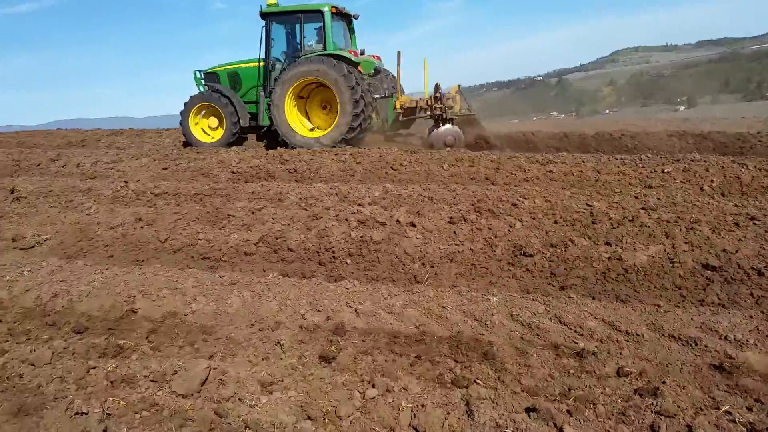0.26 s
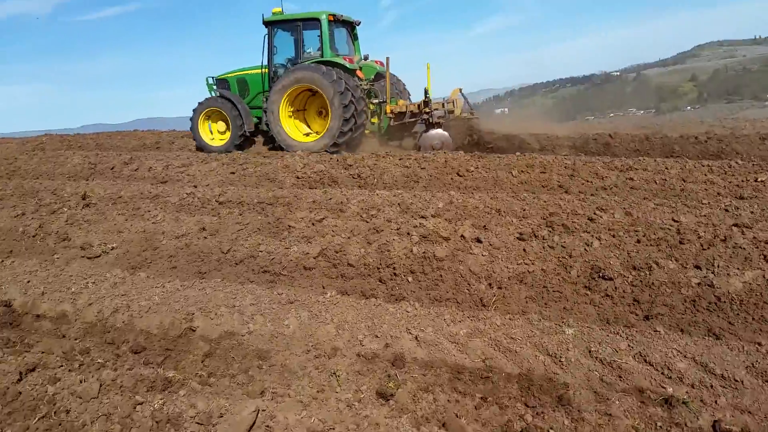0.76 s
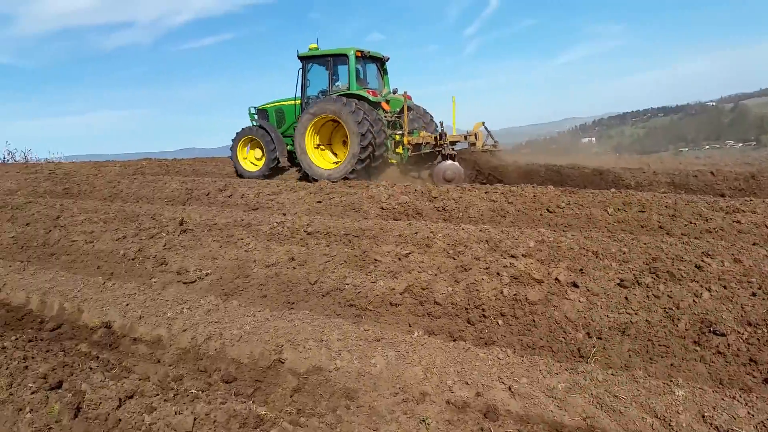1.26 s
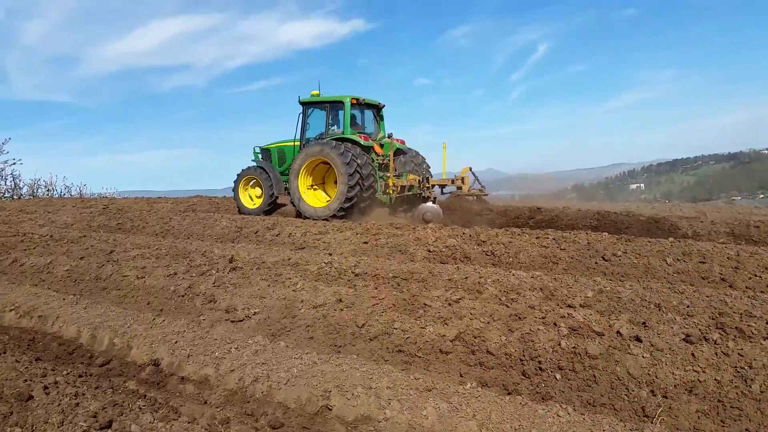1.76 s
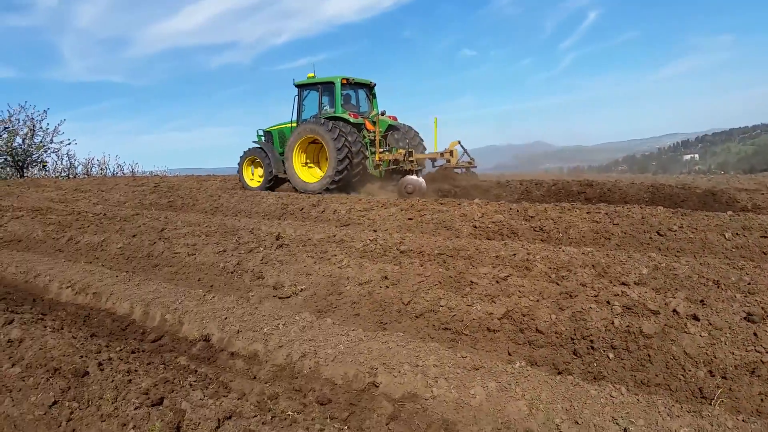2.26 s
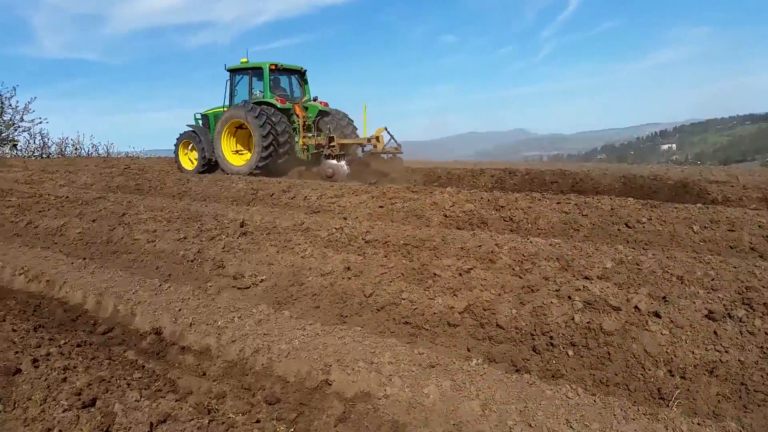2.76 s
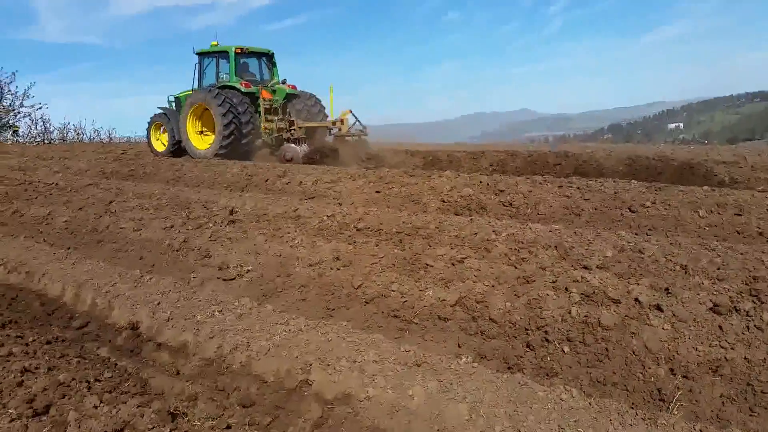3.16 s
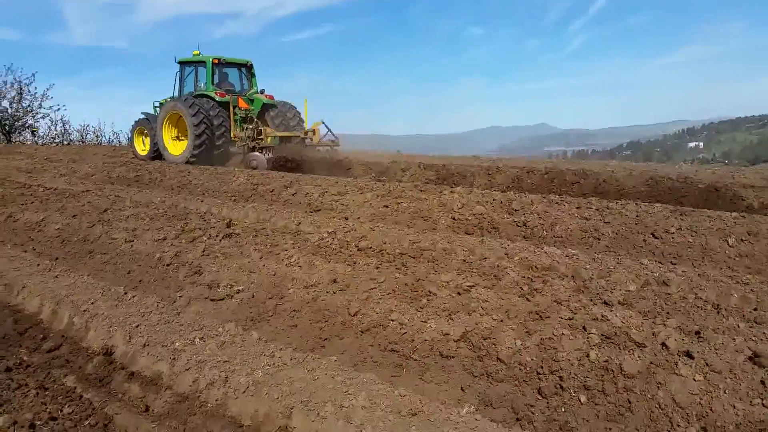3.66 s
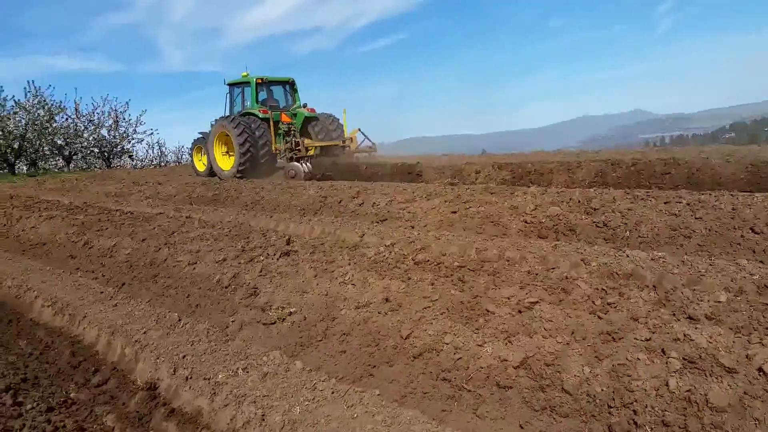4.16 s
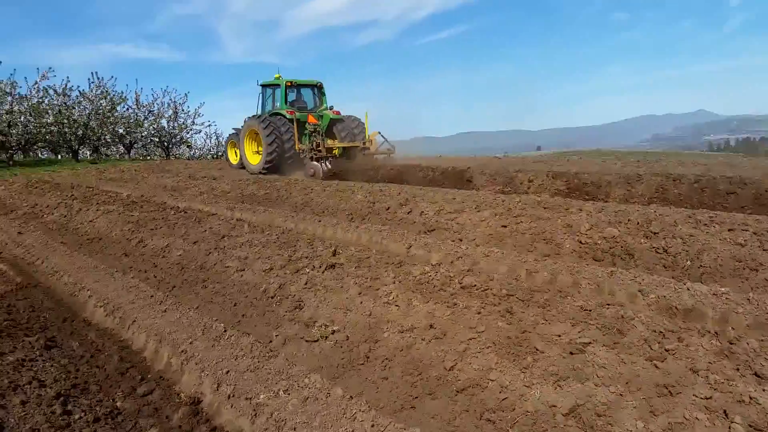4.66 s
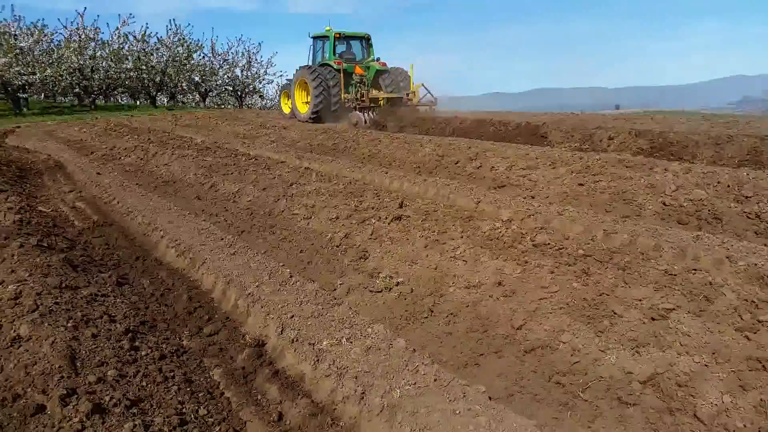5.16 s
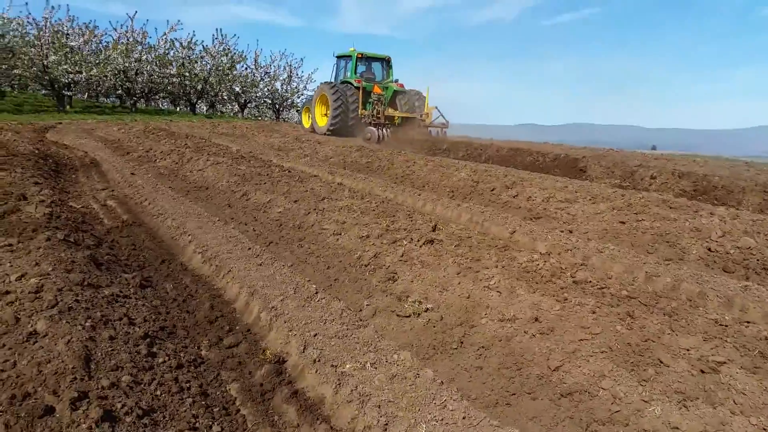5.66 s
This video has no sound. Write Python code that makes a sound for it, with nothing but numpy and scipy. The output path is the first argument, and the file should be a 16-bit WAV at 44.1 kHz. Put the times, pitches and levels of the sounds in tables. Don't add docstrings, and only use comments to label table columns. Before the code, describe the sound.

Steady low tractor engine hum with rough exhaust and clatter, hissing soil and sharp stone knocks early on, gradually receding across an open field.

```python
import sys
import numpy as np
from scipy import signal
from scipy.io import wavfile
from scipy.ndimage import uniform_filter1d

SR = 44100
rng = np.random.default_rng(int(sys.argv[2]) if len(sys.argv) > 2 else 0)


def natural_amplitude(level_db):
    exponent = np.asarray(level_db, float) / 20
    return 10 ** exponent


def log_audio(samples):
    frames = np.atleast_2d(samples).T
    limited = np.clip(frames, -1, 1)
    pcm = np.round(limited * 32767).astype(np.int16)
    wavfile.write(sys.argv[1], SR, pcm)


N = 260631
TIME = np.arange(N) / SR
HZ = np.fft.rfftfreq(1024, 1 / SR)
FRAME_TIMES = np.arange(N // 256 + 5) * 256 / SR
PIPE_WIDTH_HZ = 92

# (time [s], firing rate [Hz])
FIRING = [(0, 69.7), (.3, 72.3), (.8, 69.1), (1.05, 72.4), (1.35, 67.6), (1.61, 71.6), (1.78, 69.6),
          (1.96, 72), (2.13, 68.6), (2.39, 73.4), (2.64, 68.9), (2.9, 71.7), (3.18, 69.2), (3.35, 70.7),
          (4.75, 70.7), (4.98, 69.8), (5.35, 71.7), (5.91, 71)]
# (time [s], pipe resonance [Hz], roar level [dB])
EXHAUST = [(0, 650, -33.5), (.5, 596, -33.5), (1.0, 586, -32.5), (1.4, 572, -35), (1.9, 584, -38),
           (2.4, 571, -42), (3.0, 613, -44.5), (3.4, 654, -45), (3.7, 658, -43), (4.3, 639, -41.5),
           (4.7, 618, -40), (5.3, 622, -38.5), (5.75, 581, -35.5), (5.91, 562, -36.5)]
# (time [s], share of the side-on colour
TURNING = [(0, 0.84), (1.2, 0.85), (2.3, 0.68), (3.4, 0.18), (4.0, 0.3), (5.91, 0.7)]


def evened(x):
    return x / np.sqrt(np.mean(np.atleast_2d(x).mean(0) ** 2) + 1e-20)


def read(points, hz):
    f, value = np.transpose(points)
    return np.interp(np.log(hz + 1), np.log(f + 1), value, left=value[0], right=value[-1])


def play(rows, t=TIME):
    s, *columns = np.transpose(rows)
    return [np.interp(t, s, c) for c in columns]


def drift(hz):
    rates = np.geomspace(hz / 20, hz, num=24)
    coarse = TIME[::64]
    slow = sum(np.sin(2 * np.pi * (f * coarse + rng.random())) / np.sqrt(f) for f in rates)
    return evened(np.interp(TIME, coarse, slow))


def lobes(rows, t=TIME):
    return sum(db * np.exp(-((t - s) / max(half, .03)) ** 2) for s, half, db in rows)


def away(nearest_db, share, t=TIME):
    nearest_m, nearest_s, speed_m_per_s = 11.35, -0.55, 4.89
    along_path = speed_m_per_s * (t - nearest_s) / nearest_m
    return nearest_db - share * 10 * np.log10(1 + along_path ** 2)


def throb(cycles, depth, lag):
    return 1 + depth * np.cos(2 * np.pi * (cycles - lag))


def side_view(t=TIME):
    return np.clip(play(TURNING, t)[0], 0, 1)


def colour(points, skirt_db=-90):
    ends = [(points[0][0] * .8, skirt_db), *points, (points[-1][0] * 1.2, skirt_db)]
    return read(ends, HZ)[:, None]


def hump(hz, half_width):
    return -20 * np.log10(1 + ((HZ[:, None] - hz) / half_width) ** 2)


def noise(shape_db, patchy_db):
    # (frequency [Hz], coherence [0-1])
    likeness = [(25, .75), (50, .82), (100, .88), (250, .97), (600, .98), (900, .88), (1300, .86),
                (1800, .7), (3800, .65), (4700, .2), (7000, .4), (10300, .25), (12500, .65), (15000, .6),
                (15900, .3)]
    # (frequency [Hz], lead of the left [rad])
    phase_lead = [(0, 0), (1460, 0.1), (2580, 1.2), (3790, 2.9), (4570, 2.7), (6290, 5.5), (7580, 5.0),
                  (8610, 6.4), (10400, 6.5), (10900, 9.0), (12200, 9.9), (15400, 11.4)]
    # (frequency [Hz], left minus right [dB])
    level_lean = [(60, 0), (700, .4), (1000, -3), (2600, -4.5), (3600, 0), (4800, 12), (7200, 11),
                  (9000, 4), (11000, 5), (13200, -1), (14500, -4.5), (15500, -9.5)]
    same = np.clip(read(likeness, HZ), 0, 1)[:, None]
    lead = read(phase_lead, HZ)[:, None]
    lean = natural_amplitude(read(level_lean, HZ) / 2)[:, None]
    a, b, c, d, patches = rng.standard_normal((len(FRAME_TIMES), len(HZ), 5), dtype=np.float32).T
    patches = uniform_filter1d(uniform_filter1d(patches, size=9, axis=0), size=12, axis=1)
    left = a + 1j * b
    right = (same * left + np.sqrt(1 - same ** 2) * (c + 1j * d)) * np.exp(-1j * lead)
    centre = np.sqrt(lean ** 2 + lean ** -2 + 2 * same * np.cos(lead))
    level = natural_amplitude(shape_db + patchy_db * patches / patches.std())
    z = np.array([left * lean, right / lean]) / centre * level
    return evened(signal.istft(z, nperseg=1024, noverlap=768)[1][:, :N])


def firing_tones(cycles):
    # (time [s], half length [s], level [dB])
    first_lobes = [
        (1.35, 0.081, -1),
        (2.9, 0.31, -2),
        (4.2, .6, 0),
        (5.75, 0.3, -3),
    ]
    # (time [s], half length [s], level [dB])
    second_null = [
        (3.75, 0.85, -11),
        (4.6, 0.39, -17.5),
        (5.3, .3, -6.5),
    ]
    # (time [s], half length [s], level [dB])
    fifth_lobes = [(.25, .12, 6.1), (2.85, .3, 9.7), (3.25, 0.15, 13), (3.85, 0.37, 13.3),
                   (4.5, 0.36, 17.6), (4.85, 0.087, 8), (5.25, 0.11, 14.6)]
    # (time [s], half length [s], level [dB])
    sixth_lobes = [(.25, .1, 7), (.85, .14, 15), (1.32, .09, 18), (1.62, .2, 11), (2.23, .1, 12),
                   (4.3, .4, 6), (5.08, .12, 9)]
    turn = 2 * np.pi * cycles
    first_db = away(-23.5, 0.45) + lobes(first_lobes)
    second_db = away(-23, 0.94) + lobes(second_null)
    fifth_db = -57.5 + lobes(fifth_lobes)
    sixth_db = -55 + lobes(sixth_lobes)
    out = natural_amplitude(first_db + .5 * drift(41)) * np.cos(turn)
    out += natural_amplitude(second_db - 0.03 + 0.54 * drift(14)) * np.cos(2 * turn + np.pi / 2)
    out += natural_amplitude(fifth_db - 3.0 + 0.5 * drift(12)) * np.cos(5 * turn)
    out += natural_amplitude(sixth_db - 1.5 + 0.81 * drift(20)) * np.cos(6 * turn)
    for order, db in [(1.25, -45.5), (1.5, -51), (2.25, -50), (2.5, -53), (4, -67), (4.25, -61)]:
        out += natural_amplitude(db + 3.0 * drift(5.4)) * np.cos(order * turn)
    return np.sqrt(2) * out


def fan_tone():
    # (time [s], blade rate [Hz], level [dB])
    fan = [(0, 217.5, -32.5), (.14, 216, -28), (.35, 217, -30), (.6, 217, -26), (.85, 217.3, -25.5),
           (1.1, 218.8, -25.5), (1.4, 217, -27), (1.8, 214, -24.5), (2.1, 212.5, -30.5), (2.6, 212, -32),
           (3.08, 211.8, -31), (3.55, 211.5, -46), (3.78, 211.2, -33), (4.2, 211, -29.5),
           (4.62, 211, -38.5), (4.85, 210.8, -33), (5.35, 210.8, -33.5), (5.91, 211.8, -33.5)]
    hz, db = play(fan)
    level = natural_amplitude(db + 1.64 * drift(18))
    return np.sqrt(2) * level * np.cos(2 * np.pi * np.cumsum(hz + 0.56 * drift(13.0)) / SR)


def exhaust(cycles):
    # (time [s], half length [s], width [dB])
    pipe_spread = [
        (3.3, 1.5, .4),
        (5.75, .45, -8),
    ]
    # (frequency [Hz], density [dB per Hz])
    rumble_shape = [(15, -34), (43, -21), (60, -15.5), (90, 3), (125, 0), (165, -3), (250, -7), (330, -7),
                    (450, -9.5), (600, -18), (900, -41.5)]
    # (time [s], half length [s], level [dB])
    rumble_lobes = [
        (.1, 0.066, 1.5),
        (4.8, 0.57, 2.5),
        (5.75, 0.22, -5),
    ]
    roar_db = play(EXHAUST)[1]
    rumble_db = away(-36.5, 0.76) + lobes(rumble_lobes)
    pipe_hz = play(EXHAUST, FRAME_TIMES)[0]
    half_width = np.maximum(PIPE_WIDTH_HZ * natural_amplitude(lobes(pipe_spread, FRAME_TIMES)), 30)
    roar = noise(hump(pipe_hz, half_width) - 10 * np.log10(half_width), patchy_db=.7)
    rumble = noise(colour(rumble_shape), patchy_db=0.0) * throb(cycles, depth=.15, lag=.3)
    puffs = throb(cycles, depth=.2 + .28 * side_view(), lag=.3)
    return natural_amplitude(roar_db) * roar * puffs + natural_amplitude(rumble_db + 3.5) * rumble


def pipe_orders(cycles):
    pipe_hz, roar_db = play(EXHAUST)
    firing_hz = play(FIRING)[0]
    lines = 0
    for order in range(7, 11):
        response = 1 / (1 + ((order * firing_hz - pipe_hz) / PIPE_WIDTH_HZ) ** 2)
        waver = natural_amplitude(4 * drift(15))
        lines = lines + response * waver * np.cos(2 * np.pi * (order * cycles + .12 * drift(20)))
    return np.sqrt(2) * natural_amplitude(roar_db - 10) * side_view() * lines


def clatter(cycles):
    # (frequency [Hz], density [dB per Hz])
    from_side = [(410, -14.5), (700, -18.5), (848, -13), (1110, -7.5), (1310, -10.5), (1770, -11.5),
                 (1930, -16), (2200, -18), (2420, -15.5), (2810, -15), (3670, -22.5), (5000, -25.5),
                 (7110, -34), (8000, -39.5), (9000, -38), (11700, -66.5), (19800, -120)]
    # (frequency [Hz], density [dB per Hz])
    from_rear = [(410, -19), (700, -5), (810, -3), (1120, -1.5), (1240, -16), (1350, 0.5), (1490, -5.5),
                 (1850, -12), (2110, -14), (2350, -20.5), (2560, -13), (3460, -39.5), (4000, -27.5),
                 (5200, -54), (8800, -120)]
    # (frequency [Hz], half width [Hz])
    block_rings = [
        (1100, 300),
        (2100, 170),
    ]
    # (time [s], half length [s], level [dB])
    clatter_lobes = [
        (1.0, .2, -0.5),
        (2.2, .4, 2),
        (4.8, 0.49, 3.5),
    ]
    # (time [s], half length [s], level [dB])
    lower_lobes = [
        (.1, .9, 17),
        (3.4, .7, 12),
        (4.65, .1, 9),
    ]
    # (time [s], half length [s], level [dB])
    upper_lobes = [
        (.3, 0.61, 10),
        (1.6, .5, 11.3),
        (4.69, 0.1, 9.8),
    ]
    level_db = away(-37, 0.98, FRAME_TIMES) + lobes(clatter_lobes, FRAME_TIMES)
    side = side_view(FRAME_TIMES)
    parts = [(level_db - .7, side * colour(from_side) + (1 - side) * colour(from_rear))]
    for ring, ring_lobes in zip(block_rings, (lower_lobes, upper_lobes)):
        ring_db = -54.5 + lobes(ring_lobes, FRAME_TIMES)
        parts.append((ring_db - 2.5, hump(*ring)))
    parts.append((away(-61.5, 2.27, FRAME_TIMES) - 2.5, hump(6760, 780)))
    power = sum(natural_amplitude(2 * (db + shape_db)) / natural_amplitude(2 * shape_db).sum(0) for db, shape_db in parts)
    block = np.sqrt(power.sum(0).mean()) * noise(10 * np.log10(power), patchy_db=1.0)
    return natural_amplitude(.6 * drift(12)) * block * throb(cycles, depth=.1, lag=.35)


def soil(cycles):
    # (frequency [Hz], density [dB per Hz])
    soil_shape = [(1760, -24), (3000, -6), (3460, -5.5), (4660, 4.5), (5160, -1.5), (6120, -19.5),
                  (7050, -35), (7700, -36), (9000, -50), (11700, -61.5), (19800, -120)]
    level = natural_amplitude(away(-52.5, 0.089) + 0.21 * drift(25))
    return level * noise(colour(soil_shape), patchy_db=0.83) * throb(cycles, depth=.06, lag=.4)


def intake(cycles):
    # (frequency [Hz], density [dB per Hz])
    hiss_shape = [(4710, -63.5), (8000, -36.5), (8540, -27.5), (9700, -30), (11000, -20.5), (13100, -7),
                  (14100, -1.5), (15000, 2.5), (15700, -5)]
    # (time [s], half length [s], level [dB])
    beam = [
        (.4, 0.42, 7.8),
        (1.0, .25, 5.3),
        (2.75, 0.14, 1.5),
        (3.75, 0.12, 1.6),
        (4.9, 0.23, 4),
    ]
    octaves = np.log2(np.clip(HZ, 11000, None) / 14000)[:, None]
    dulling_db = octaves * (FRAME_TIMES - 1)
    level = natural_amplitude(away(-44.5, 1.65) + lobes(beam) + .9 * drift(30))
    hiss = noise(colour(hiss_shape) - dulling_db, patchy_db=.6)
    return level * hiss * throb(cycles, depth=.13, lag=.15)


def whine():
    # (time [s], half length [s], level [dB])
    whine_lobe = [
        (1.2, 1.1, 18),
    ]
    hz = 3920 - 10 * TIME
    level = natural_amplitude(-70 + lobes(whine_lobe) + 3 * drift(40))
    line = level * np.cos(2 * np.pi * np.cumsum(hz + 14 * drift(30)) / SR)
    return np.sqrt(2) * line * np.array([[1], [-.65]])


def stones():
    # (time [s], thud [dB], grit above the thud [dB], t60 [s], ring [dB])
    knocks = [(1.075, -36.5, -10.5, 0.094, -52), (1.128, -49.5, -8, .1, -60),
              (1.285, -39, -2.5, 0.096, -73), (1.594, -29.5, -4, 0.14, -39), (1.794, -32, -5.5, 0.11, -64),
              (1.818, -40, 2, 0.39, -44), (1.904, -60, -6, .1, -49), (2.052, -44, -10, 0.039, -35),
              (2.403, -43.5, -17, 0.077, -40.5), (2.443, -60, 13, 0.089, -52), (2.643, -42, -20, .1, -60),
              (3.179, -51, -18, .08, -54), (3.546, -44.5, -15, 0.11, -52), (4.453, -60.5, -7.5, .08, -63),
              (4.98, -66, 8, .3, -52), (5.688, -61, 10, 0.091, -60)]
    # (frequency [Hz], density [dB per Hz])
    thud_shape = [(300, -10), (700, 9), (2200, -4.5), (4500, -4), (5800, -6), (7000, -27), (8500, -51)]
    # (frequency [Hz], density [dB per Hz])
    grit_shape = [(5000, -34), (7000, -16.5), (8500, -21.5), (10000, -22), (12000, -15), (14000, -9.5),
                  (15700, 0)]
    disc_hz = 2200
    dull = noise(colour(thud_shape), patchy_db=.5)
    bright = noise(colour(grit_shape), patchy_db=1.0)
    out, t = np.zeros((2, N)), np.arange(8000) / SR
    modes = np.sin(2 * np.pi * disc_hz * t) + 0.98 * np.sin(2 * np.pi * 1.1 * disc_hz * t)
    for s, db, grit_db, t60, ring_db in knocks:
        start = round(s * SR)
        at = slice(start, start + len(t))
        fade = np.tanh(t / 0.00076) * natural_amplitude(-60 * np.maximum(t - .01, 0) / max(t60, .02))
        swell = 0.53 + 0.45 * np.tanh(t / 0.017)
        thud = swell * (natural_amplitude(db) * dull[:, at] + natural_amplitude(ring_db) * modes)
        spray = (0.61 + 0.49 * np.exp(-t / .004)) * natural_amplitude(db + grit_db) * bright[:, at]
        out[:, at] += (thud + spray) * fade
    return out


def frame_jolt():
    jolt_s, jolt_hz, jolt_db, t60_s = 1.796, 98.5, -19, 0.23
    out, t = np.zeros(N), np.arange(8000) / SR
    decay = np.tanh(t / 0.0058) * natural_amplitude(jolt_db - 60 * t / t60_s)
    out[round(jolt_s * SR):][:len(t)] = decay * np.sin(2 * np.pi * jolt_hz * t)
    return out


def scene():
    cycles = np.cumsum(play(FIRING)[0]) / SR
    engine = firing_tones(cycles) + fan_tone() + exhaust(cycles) + pipe_orders(cycles) + clatter(cycles)
    return engine + soil(cycles) + intake(cycles) + whine() + stones() + frame_jolt()


def band_limit(x):
    return signal.sosfilt(signal.butter(12, 15890, fs=SR, output="sos"), x)


def record(dry):
    # (frequency [Hz], share of bands left out [0-1])
    holes = [(3000, 0), (5500, .03), (7000, .2), (8200, .5), (9800, .45), (10800, .12), (12000, 0)]
    hz, _, z = signal.stft(dry, SR, nperseg=1024)
    cells = rng.random((2, len(hz) // 4 + 1, z.shape[2] // 4 + 1))
    chance = cells.repeat(4, axis=1).repeat(4, axis=2)[:, :len(hz), :z.shape[2]]
    kept = chance > read(holes, hz)[:, None]
    below_edge = (hz < 15760)[:, None]
    thinned = signal.istft(z * (.03 + kept) * below_edge, SR, nperseg=1024)[1][:, :N]
    closing_fade = np.minimum(TIME[::-1] / 0.0031, 1)
    return band_limit(thinned * closing_fade)


dry = scene()
out = record(dry)
log_audio(out)
```